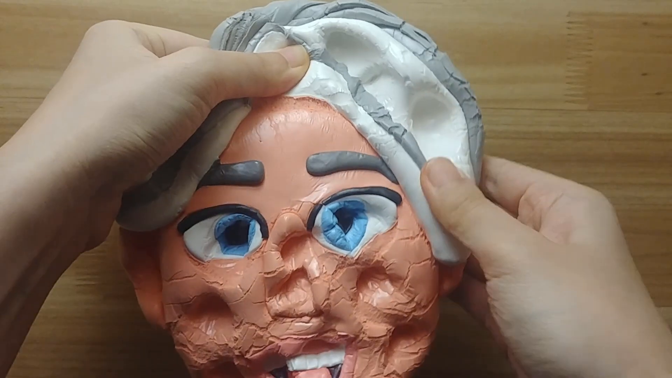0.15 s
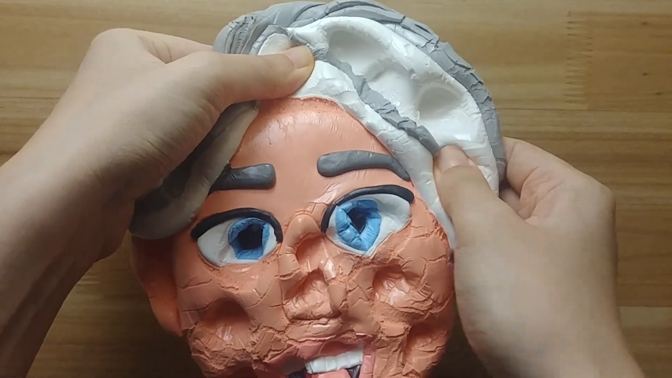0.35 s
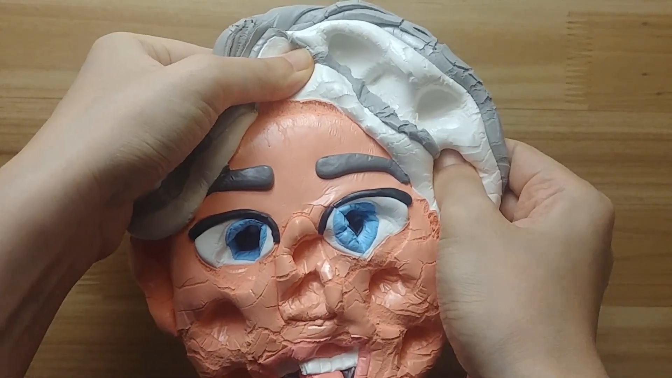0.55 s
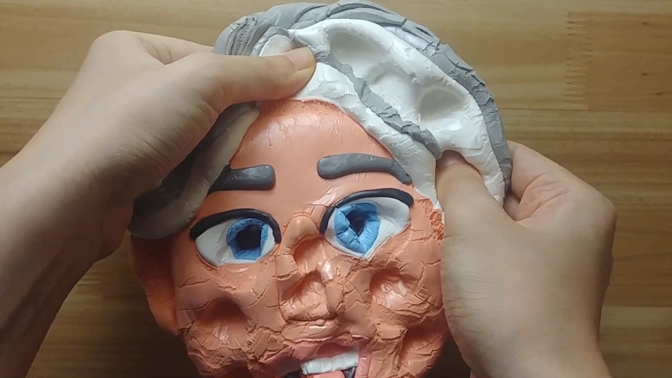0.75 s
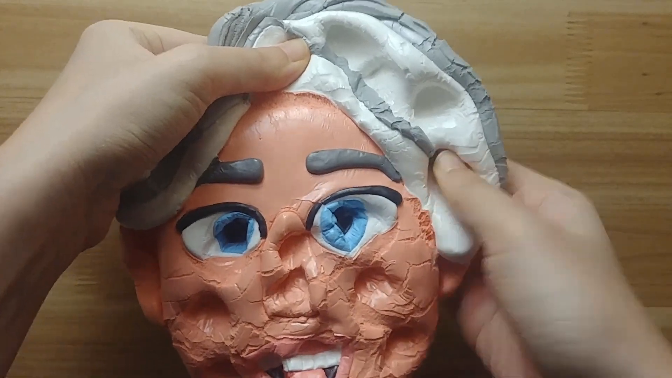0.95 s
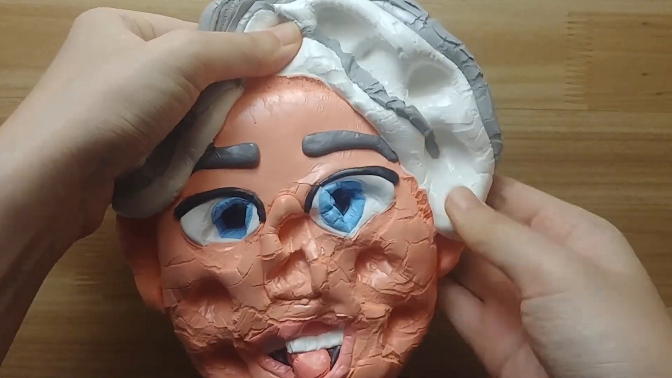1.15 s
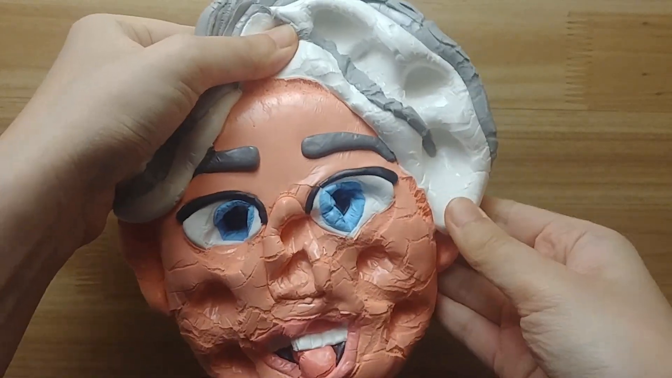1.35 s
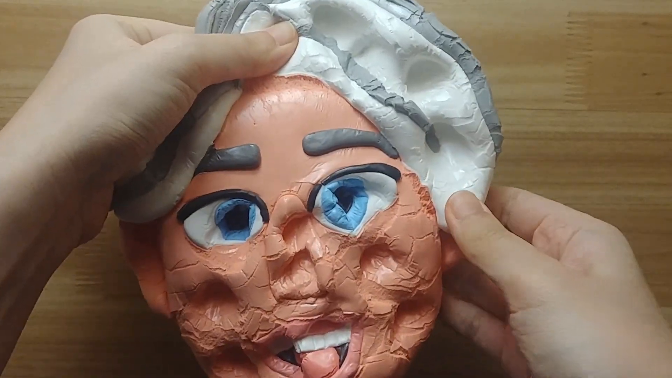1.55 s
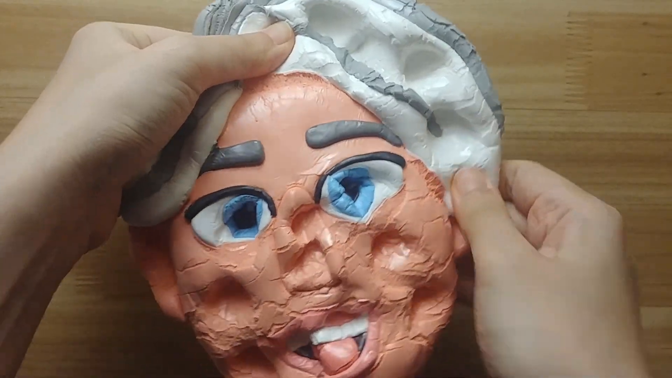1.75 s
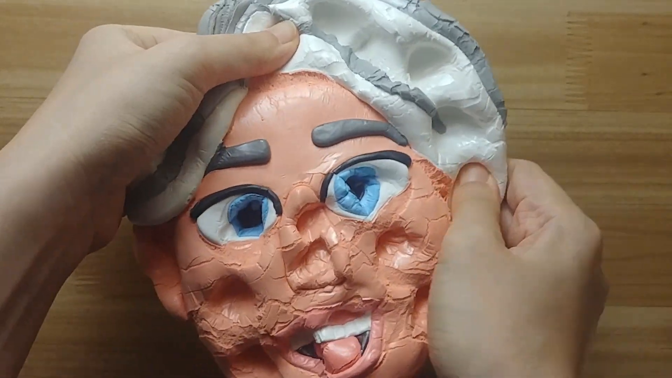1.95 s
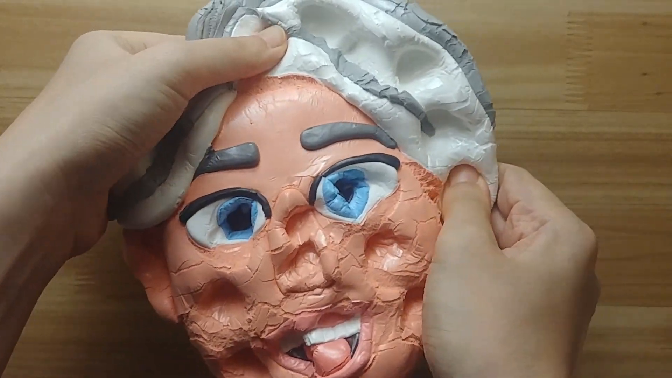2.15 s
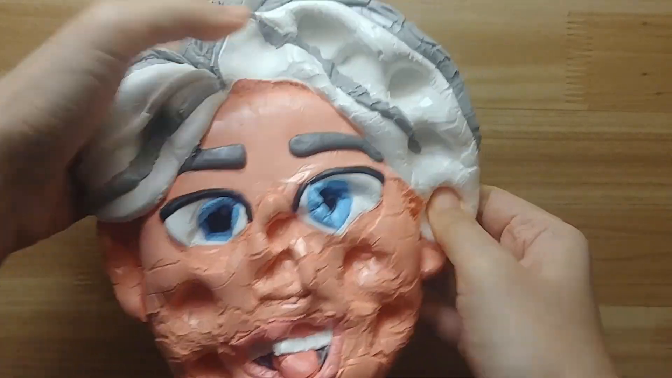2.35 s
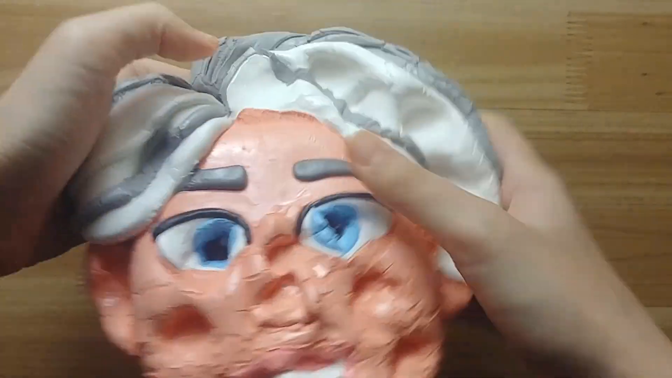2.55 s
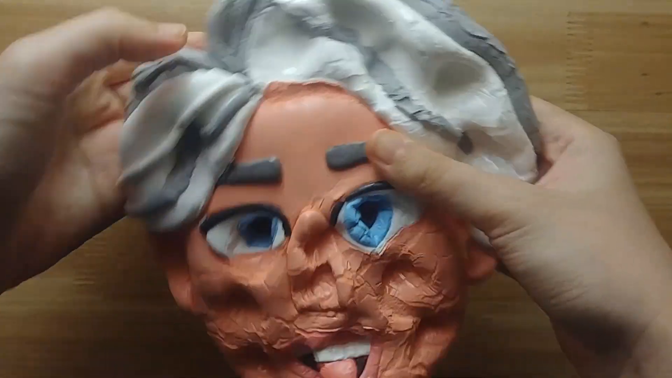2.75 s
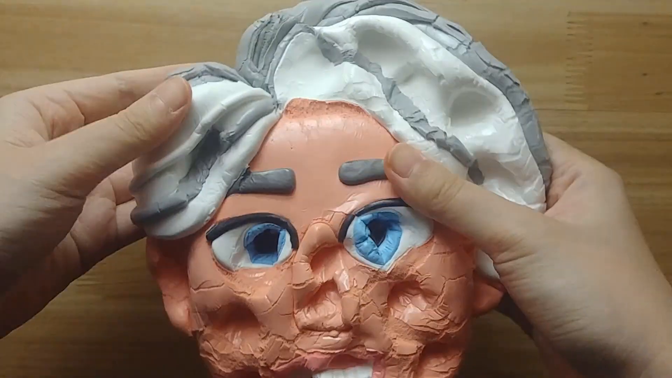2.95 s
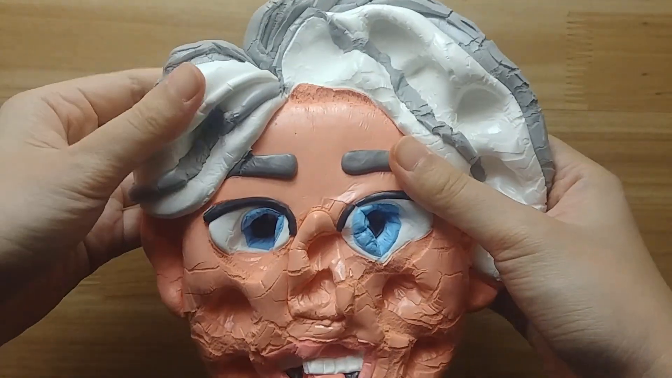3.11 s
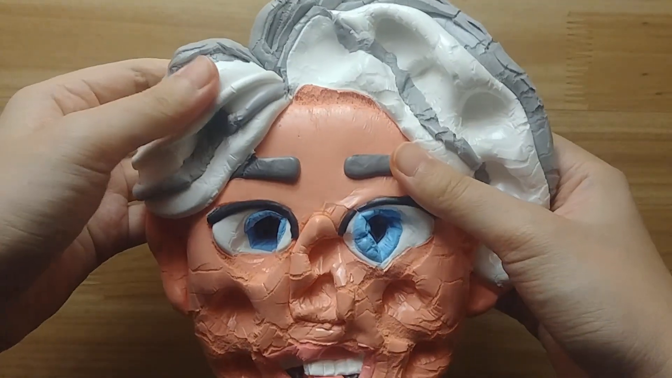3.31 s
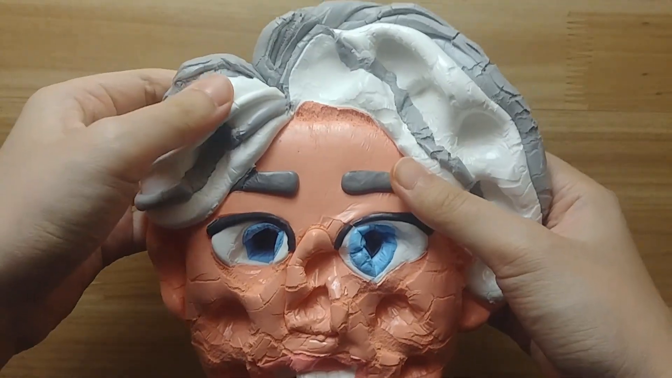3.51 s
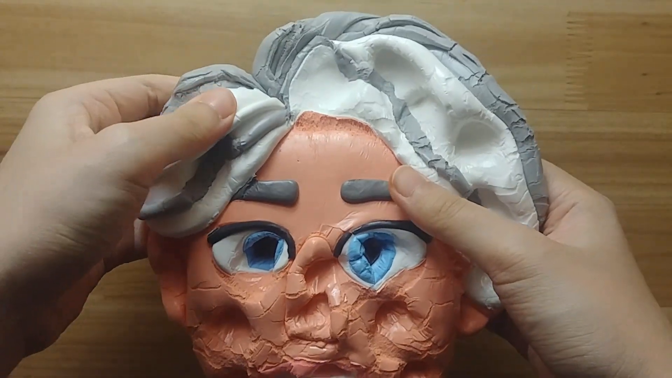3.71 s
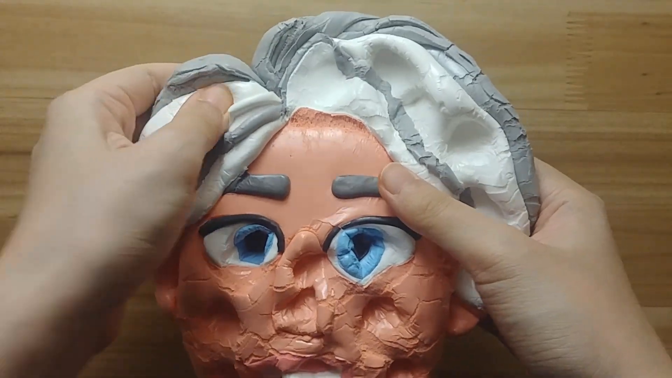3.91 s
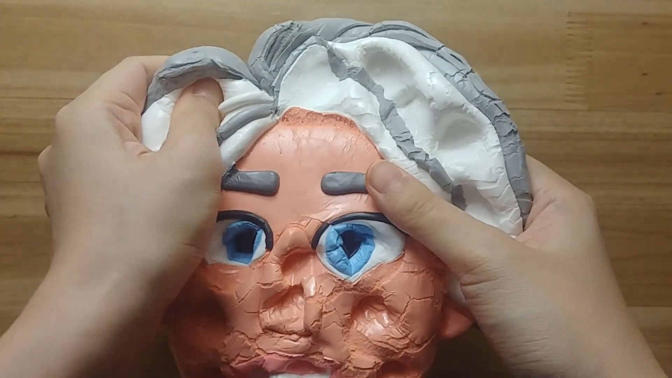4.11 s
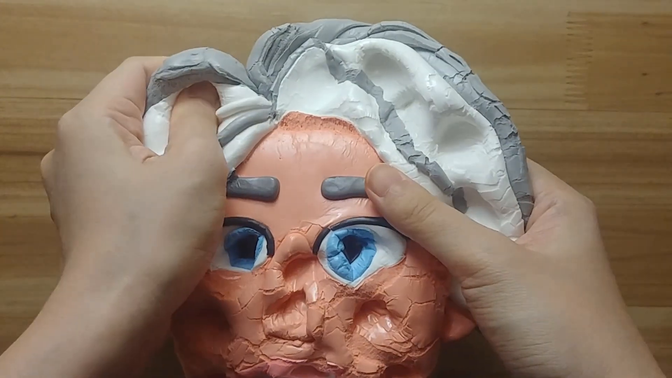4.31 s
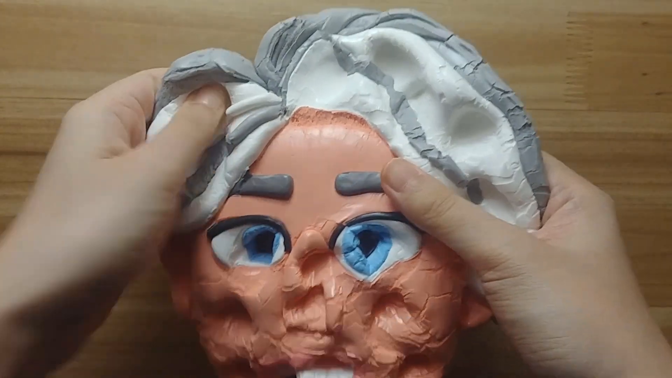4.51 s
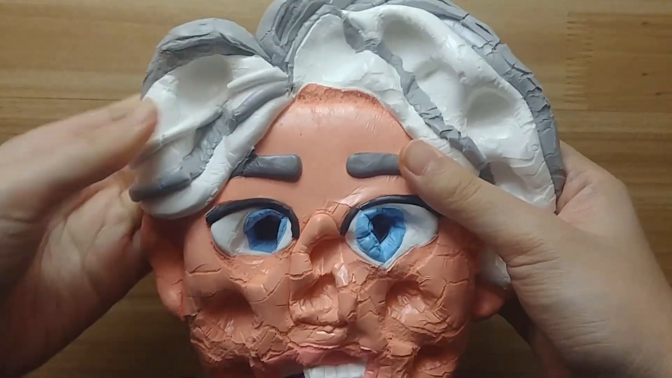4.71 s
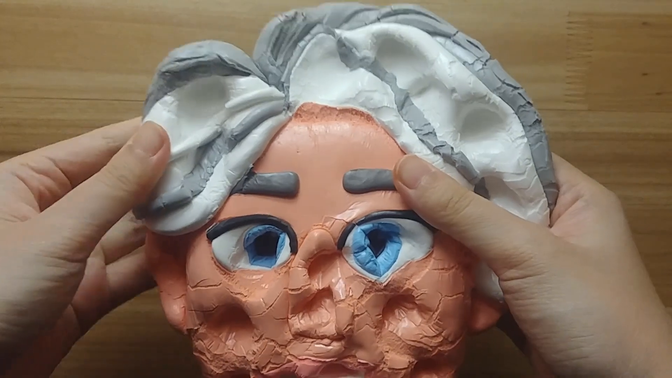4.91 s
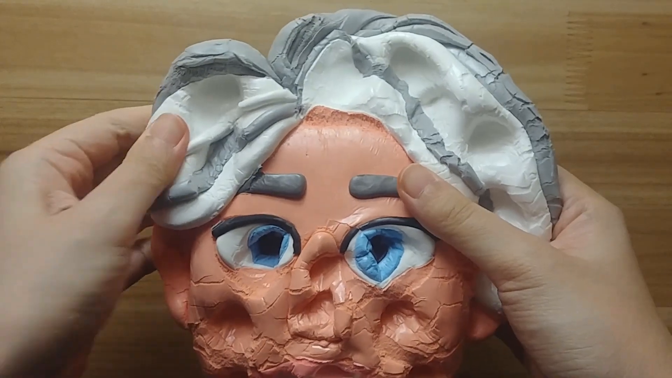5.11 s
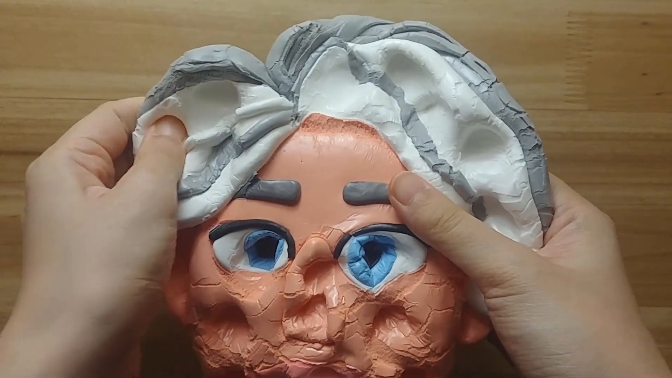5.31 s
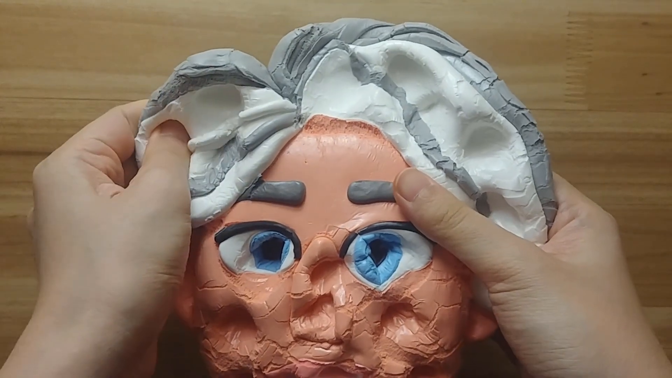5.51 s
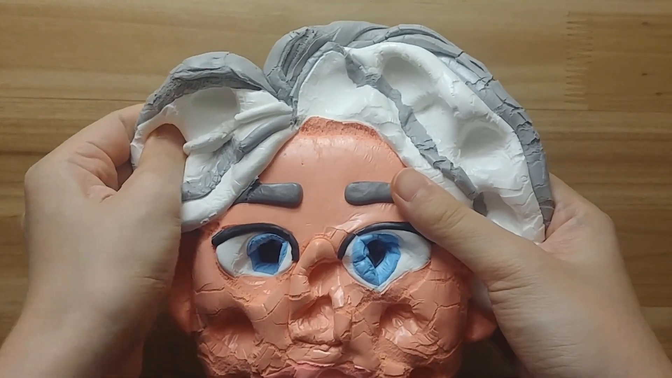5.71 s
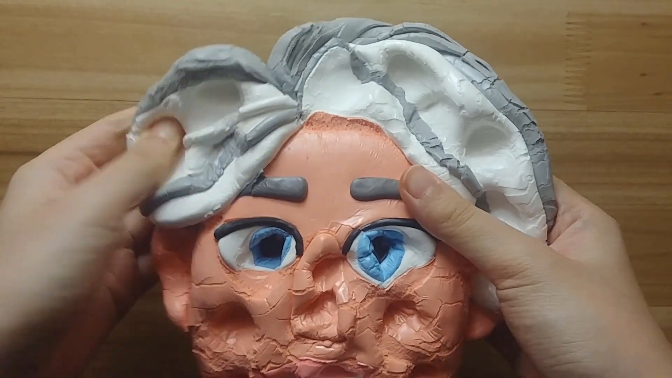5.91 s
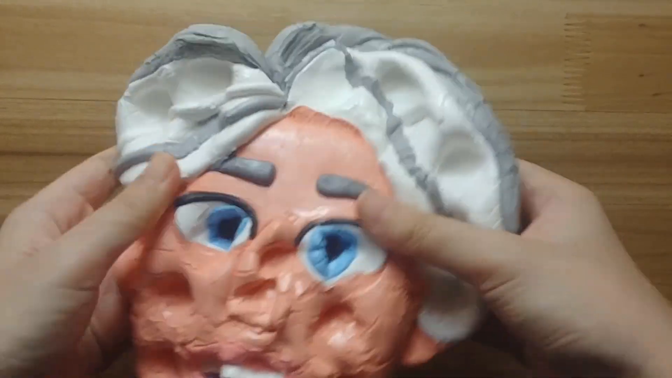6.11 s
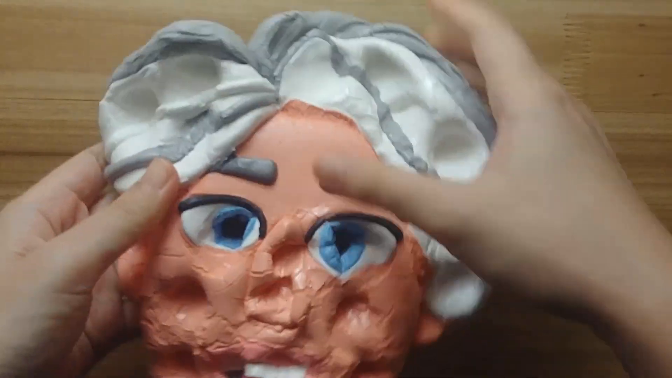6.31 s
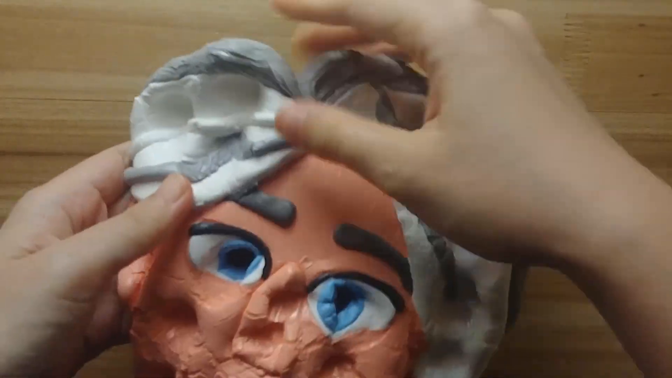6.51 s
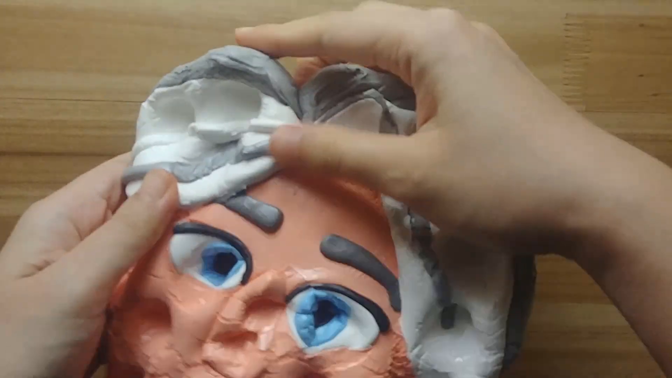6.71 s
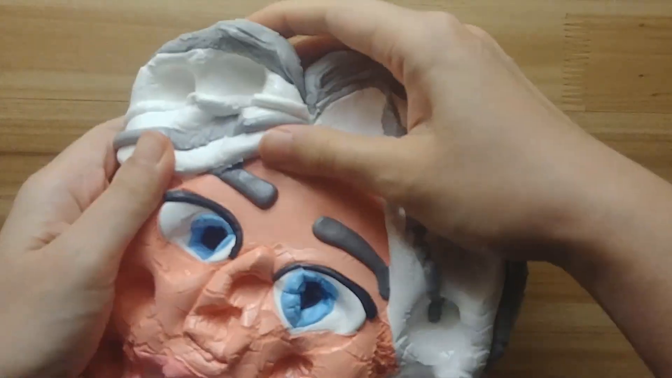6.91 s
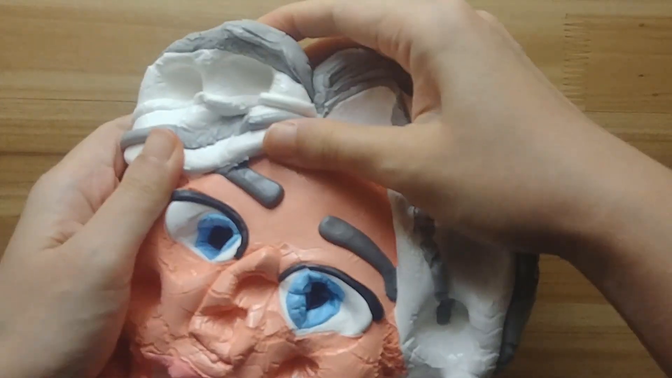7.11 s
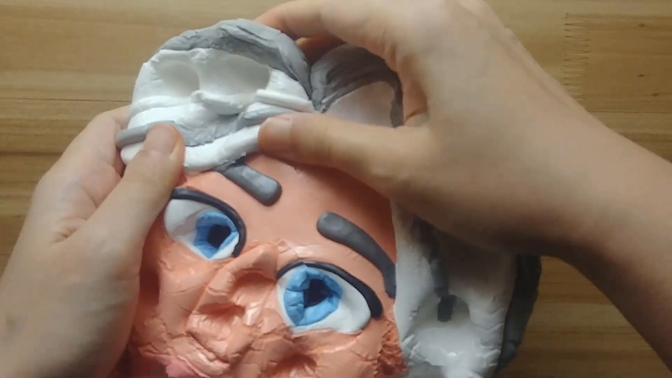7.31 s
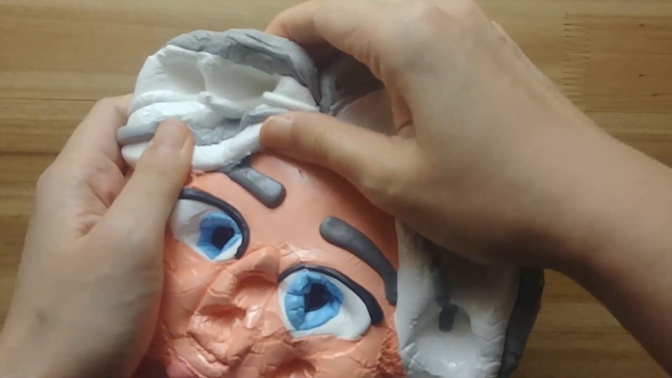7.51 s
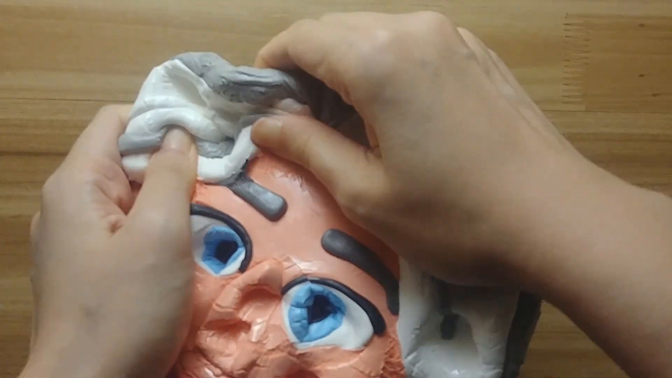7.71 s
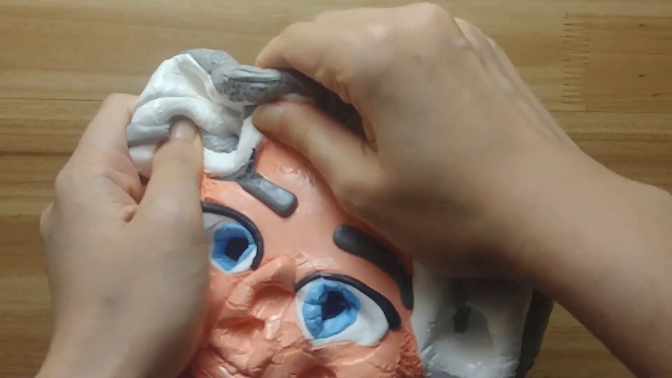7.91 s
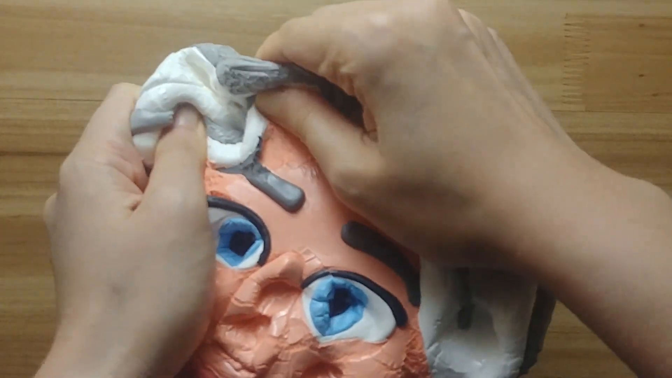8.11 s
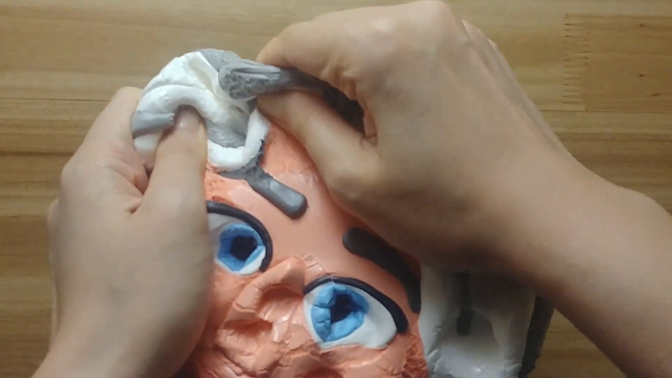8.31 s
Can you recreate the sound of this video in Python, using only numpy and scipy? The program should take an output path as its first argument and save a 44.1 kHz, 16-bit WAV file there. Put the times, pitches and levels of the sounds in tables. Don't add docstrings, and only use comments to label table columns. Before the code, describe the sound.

Dry clay glaze snaps and splinters under squeezing fingers in brief separate bursts, the first ones loud and sharp, the last softer and duller.

```python
import sys
import numpy as np
from scipy import signal
from scipy.fft import rfft, irfft
from scipy.io import wavfile

SR = 44100
rng = np.random.default_rng(int(sys.argv[2]) if len(sys.argv) > 2 else 0)


def generate_wav(signal):
    frames = np.transpose(np.atleast_2d(signal))
    scaled = np.clip(frames, -1, 1) * 32767
    pcm = np.round(scaled).astype(np.int16)
    wavfile.write(sys.argv[1], SR, pcm)


def ratio_of_db(decibels):
    return 10 ** (np.asarray(decibels, float) / 20)


N = 368235


# (start_s, snap level_db, shell ring_db over the snap, core thud_db over the snap)
CHEEK_FIRST = [(.1055, -38.5, -4.5, -22), (.1296, -18, 11, -17), (.1461, -16.5, -3.5, -18.5),
               (.1672, -27.5, -4, -27.5), (.1831, -23.5, -12, -35.5), (.19, -18, 9, -27),
               (.1985, -4.5, -1.5, -12.5), (.211, -10, -1, -15), (.2267, -20, -20, -15.5),
               (.2318, -11, 0.5, -15), (.2475, -18.5, 8, -16), (.2534, -19.5, -9, -14),
               (.2642, -17, -0.5, -19), (.2679, -14.5, 0, -9.5), (.2725, -6.5, -11.5, -15),
               (.2893, -26.5, 1.5, -6.5), (.3, -18.5, .5, -18), (.3109, -11, -9.5, -17),
               (.3201, -14.5, -11.5, -22), (.3337, -27, 2.5, -14.5), (.3572, -22.5, -8.5, -22.5),
               (.378, -23, -8, -30.5), (.3898, -25.5, -8.5, -32), (.4069, -27.5, -14, -33.5),
               (.428, -33.5, -5, -23), (.4416, -23, -27, -35), (.4543, -20.5, -1.5, -18),
               (.4636, -2.5, -4, -19.5), (.5045, -29, -8.5, -32.5), (.5393, -29, -8, -20)]
CHEEK_AGAIN = [(1.5574, -42.5, -7.5, -34), (1.5695, -24.5, 0, -37.5), (1.5781, -23, -3.5, -22),
               (1.5902, -19.5, -10, -36.5), (1.5998, -23, -4.5, -31), (1.6095, -23, -8, -34),
               (1.6234, -16, -30.5, -35.5), (1.6377, -15, -4, -35), (1.6414, -8.5, -13.5, -20.5),
               (1.669, -22.5, -5, -18), (1.6836, -16, -24.5, -22.5), (1.7014, -16, -18.5, -24),
               (1.7158, -20.5, -25, -21), (1.7188, -16, -24, -35.5), (1.726, -24.5, -14, -36),
               (1.74, -20.5, -13.5, -27), (1.7457, -17, -6.5, -23), (1.7628, -6.5, -22.5, -34),
               (1.7689, -8.5, -6.5, -24), (1.7765, -8, -12, -15.5), (1.7887, -11, -19.5, -31),
               (1.8566, -37, -2, -16), (1.8702, -18.5, -28, -28), (1.8946, -25.5, -30, -31)]
# (pitch_hz, width_hz, level_db)
RIGHT_SHELL = [(2405, 350, -7.5), (2770, 500, 1.5), (3069, 160, -3.5)]
# (pitch_hz, level_db per Hz)
RIGHT_CORE = [(60, -29.5), (150, -21), (400, -14.5), (750, -8.5), (1080, -1), (1300, -5.5), (1900, -4),
              (2500, -27.5), (4400, -90)]


def right_cheek():
    cracks = [squeeze(CHEEK_FIRST, GRIPS[0]), squeeze(CHEEK_AGAIN, GRIPS[1])]
    return clay(cracks, RIGHT_SHELL, RIGHT_CORE, thick_db=3.0)


# (start_s, snap level_db, shell ring_db over the snap, core thud_db over the snap)
CURL_FIRST = [(3.7389, -40, -25, -13), (3.7462, -31.5, -29, -36), (3.7616, -36, -47, -16),
              (3.7661, -24.5, -21, -31), (3.771, -13.5, -7.5, -11), (3.7866, -26.5, -29, -10),
              (3.7907, -22.5, -26, -30), (3.81, -21.5, -19.5, -33), (3.8138, -15, -10, -15),
              (3.8173, -11.5, -12, -13.5), (3.822, -11.5, -24.5, -14), (3.8514, -27.5, -29, -38.5),
              (3.862, -27, -24.5, -20), (3.8675, -9.5, -15.5, -22.5), (3.8818, -12.5, -6, -19),
              (3.8963, -12.5, -22.5, -20.5), (3.9193, -28.5, -8.5, -15), (3.9365, -20.5, -25.5, -19.5),
              (3.953, -10.5, -5.5, -7), (3.9707, -17.5, -3, -14), (3.9757, -16, -43, -22),
              (3.9865, -25.5, -28, -35), (4.002, -24, -10, -16), (4.0176, -31.5, -24.5, -25),
              (4.0339, -28, -6.5, -21), (4.0508, -29.5, -2, -33), (4.0709, -28, -30, -41),
              (4.0868, -27.5, -35.5, -39), (4.1073, -46, -33, -39), (4.1216, -38, -25, -32.5)]
CURL_AGAIN = [(5.1391, -37, -10, -11), (5.142, -19, -25, -24), (5.1499, -28, -3.5, -23.5),
              (5.1531, -21, -7, -23), (5.164, -20, -3.5, -17), (5.171, -19.5, -5, -13.5),
              (5.1781, -21.5, -12, -16), (5.2053, -22, -14, -36), (5.2219, -30.5, -25, -17),
              (5.2266, -30, -7, -18), (5.2419, -16.5, -9, -18), (5.2643, -24, -10, -22.5),
              (5.2683, -15.5, -27.5, -27.5), (5.272, -10, -23.5, -21), (5.2944, -15, -17, -16.5),
              (5.331, -21, -11, -14.5), (5.3542, -31, -3.5, -10), (5.3613, -17.5, -8.5, -31),
              (5.3711, -27, -6.5, -12.5), (5.3819, -28.5, -1, -22), (5.385, -23, -41, -11),
              (5.4072, -28, -19.5, -35), (5.4305, -38, -25, -34.5)]
# (pitch_hz, width_hz, level_db)
LEFT_SHELL = [(2120, 5000, -8.5), (2665, 1200, -3), (3100, 1100, -11.5)]
# (pitch_hz, level_db per Hz)
LEFT_CORE = [(150, -39.5), (400, -18), (720, -22.5), (850, -4.5), (1140, -1.5), (1500, -1), (2000, -3),
             (2600, -21.5), (4400, -89.5)]


def left_curl():
    cracks = [squeeze(CURL_FIRST, GRIPS[2]), squeeze(CURL_AGAIN, GRIPS[3])]
    return clay(cracks, LEFT_SHELL, LEFT_CORE, thick_db=2.02)


# (start_s, snap level_db, shell ring_db over the snap, core thud_db over the snap)
FOLD = [(7.6388, -47, -22, -26.5), (7.6666, -39.5, -22, -54), (7.6979, -27.5, -32, -20),
        (7.7235, -29.5, -15.5, -21), (7.7308, -29, -3, -19), (7.7406, -28, -4, -13.5),
        (7.7517, -25.5, -23, -22.5), (7.7564, -9.5, -10, -19), (7.7697, -24, -6, -16),
        (7.7766, -24, -15, -31.5), (7.7917, -29.5, -16, -32.5), (7.7998, -29.5, -18, -36.5),
        (7.851, -35, -24.5, -21), (7.8682, -35.5, -17, -39), (7.8803, -33, -12.5, -30),
        (7.8858, -31.5, -6, -9), (7.8913, -26.5, -0.5, -11.5), (7.9075, -31.5, -2, -5.5),
        (7.9266, -26.5, -27, -55), (7.9341, -31.5, -25, -43), (7.955, -30.5, -9, -31),
        (7.9984, -44.5, -29, -34), (8.0168, -30.5, -5, -8.5), (8.0306, -37, 3, -4), (8.0371, -33, -17, -26),
        (8.0849, -38, -23, -26.5), (8.0959, -34.5, -8, -13), (8.1075, -36.5, -9, -11),
        (8.1469, -33, -4, -12), (8.1723, -31, -6, -11)]
# (pitch_hz, width_hz, level_db)
FOLD_SHELL = [(2510, 630, -11.5), (2810, 500, -3), (3260, 510, -5)]
# (pitch_hz, level_db per Hz)
FOLD_CORE = [(150, -26), (500, -19.5), (1000, -10), (1250, -0.5), (1650, 0.5), (2000, -4.5), (2600, -27),
             (4400, -91)]


def folding_clay():
    return clay([squeeze(FOLD, GRIPS[4])], FOLD_SHELL, FOLD_CORE, thick_db=5.0)


# (top octave level_db over the snap,
# top lost_db per dB of core thud, top lost_db per dB of snap)
GRIPS = [
    (-11.5, 0.053, -0.029),
    (-12.5, 0.12, -0.19),
    (-11, -0.065, .05),
    (-10, 0.056, .4),
    (-17, 0.28, .2),
]
CRUMB_AFTER_S = (.009, .024)


def squeeze(cracks, grip):
    cracks = np.array(cracks)
    start_s, snap_db, _, thud_db = cracks.T
    top_db, dulling, thinning = grip
    luck = rng.standard_normal((3, len(cracks)))
    wait_s = rng.uniform(*CRUMB_AFTER_S, len(cracks))

    top = top_db - dulling * (thud_db + 24) - thinning * (snap_db + 22)
    top += 2 * luck[0]
    pan_db = 4.8 + 0.8 * luck[1]
    crumb_db = snap_db - 17 + 3 * luck[2]
    crumb_ring_db, crumb_thud_db = np.full_like(top, -14), np.full_like(top, -30)

    breaks = np.column_stack([cracks, top, pan_db])
    crumbs = np.column_stack([start_s + wait_s, crumb_db, crumb_ring_db, crumb_thud_db, top, pan_db])
    return np.vstack([breaks, crumbs])


# (pitch_hz, level_db per Hz)
SNAP = [(900, -46), (1600, -27.5), (2600, -13.5), (3500, -10), (4300, -9.5), (5300, -6.5), (6800, -5),
        (7650, 5), (8500, -1), (9500, -11), (10700, -21), (14000, -56)]
# (pitch_hz, level_db per Hz)
TOP = [(9000, -46), (10600, -17.5), (11400, -1.5), (12400, -0.5), (15200, 4), (15900, -7)]


def clay(cracks, shell_modes, core_points, thick_db):
    glaze, top, shell, core = fractures(cracks)
    snap = [(hz, db - thick_db * np.log2(hz / 5500)) for hz, db in SNAP]
    hard = colour(glaze, snap) + colour(top, TOP)
    return hard + ring(shell, shell_modes) + colour(core, core_points)


CRACK_T60_S = [0.043, 0.034, 0.0097, .02]
ROOM_T60_S = [.15, 0.1, .13, 0.13]
ROOM_DB = [-12, -10, -12, -8.5]
FIRST_BREAK = [0.42, 0.33, 0.35, 0.4]
PARTING = [2.3, 1.2, 3, 2.9]
# (centre pitch_hz, spread_octaves, sharpness Q, share)
FLAKES = [(4400, .28, 4, .45), (2500, .12, 4, .45)]


def fractures(cracks):
    t = np.arange(3400) / SR
    force = np.zeros((4, 2, N + len(t)))

    def per_layer(table):
        return np.array(table)[:, None, None]

    fade = ratio_of_db(-60 * t / per_layer(CRACK_T60_S))
    fade *= 1 + per_layer(FIRST_BREAK) * np.exp(-t / 0.0006)
    echo = ratio_of_db(per_layer(ROOM_DB) - 60 * t / per_layer(ROOM_T60_S))
    echo *= np.sqrt(1 - np.exp(-t / 0.0013))

    for start_s, db, shell_db, core_db, top_db, pan_db in np.concatenate(cracks):
        burst = fade * splits(t, scatter_db=-3.0, clump_s=0.0009)
        burst *= np.sqrt(np.sum(fade ** 2, axis=2) / np.sum(burst ** 2, axis=2))[..., None]
        burst[..., 0] += rng.choice([-1, 1]) * np.array(PARTING)[:, None]
        burst += echo * rng.standard_normal((2, len(t)))
        burst[0] = flake(burst[0], *FLAKES[0])
        burst[2] = flake(burst[2], *FLAKES[1])
        share = ratio_of_db(db + np.array([-0.3, top_db, shell_db - 0.5, core_db + 0.23]))
        i = int(start_s * SR)
        force[..., i:i + len(t)] += per_layer(share) * sides(pan_db) * burst
    return force[..., :N]


ALIKE = [0.084, .087, 0.48, 0.37]


def splits(t, scatter_db, clump_s):
    clump = (t / clump_s).astype(int)
    size = ratio_of_db(scatter_db * rng.standard_normal(len(t)))[clump]
    shared, own = rng.standard_normal((2, len(t)))
    alike = np.array(ALIKE)[:, None]
    one_port = np.tile(shared, (len(ALIKE), 1))
    other_port = alike * shared + np.sqrt(1 - alike ** 2) * own
    return np.stack([one_port, other_port], axis=1) * size


def flake(x, hz, octaves, sharp, share):
    pitch_hz = hz * 2 ** (octaves * np.clip(rng.standard_normal(), -2, 2))
    b, a = signal.iirpeak(pitch_hz, sharp, fs=SR)
    ringing = np.sqrt(sharp) * signal.lfilter(b, a, x)
    return (x + share * ringing) / np.sqrt(1 + share ** 2)


def ring(x, modes):
    out = 0
    for hz, width, db in modes:
        b, a = signal.iirpeak(hz, hz / width, fs=SR)
        tone = signal.lfilter(b, a, signal.lfilter(b, a, x))
        out = out + ratio_of_db(db) * tone / np.sqrt(np.pi * width / SR / 2)
    return out


def curve_db(hz, points):
    at, db = np.transpose(points)
    return np.interp(np.log(np.maximum(hz, 1)), np.log(at), db)


def colour(x, points):
    db = curve_db(np.arange(2049) * SR / 4096, points)
    cepstrum = irfft(np.log(ratio_of_db(np.maximum(db, -80))))
    cepstrum[1:2048] *= 2
    cepstrum[2049:] = 0
    taps = irfft(np.exp(rfft(cepstrum)))
    taps /= np.sqrt(np.sum(taps ** 2))
    return signal.fftconvolve(x, taps[None], axes=1)[:, :N]


def sides(pan_db):
    return ratio_of_db(np.array([[pan_db], [-pan_db]]) / 2)


# (start_s, end_s)
SQUEEZES = [
    (.105, .573),
    (1.553, 1.906),
    (3.735, 4.139),
    (5.137, 5.44),
    (7.638, 8.205),
]


def gate():
    t, edge_s = np.arange(N) / SR, 0.002
    is_open = 0
    for start_s, end_s in SQUEEZES:
        is_open = is_open + np.clip(np.minimum(t - start_s + edge_s, end_s - t) / edge_s, 0, 1)
    return is_open


# (pitch_hz, level_db per Hz)
TONE = [(15, -61.5), (25, -30), (32, -25), (41, -13.5), (56, -7), (91, 0.5), (133, -6.5), (284, -10.5),
        (771, -17.5), (4700, -26), (10300, -35.5), (15800, -30.5)]


def room_tone():
    size = round(109 / 30 * SR)
    noise = rfft(rng.standard_normal((3, size)))
    hz = np.arange(size // 2 + 1) * SR / size
    alike = 0.5 / (1 + (hz / 150) ** 2)
    port_db = 3.5 / (1 + ((hz - 7600) / 450) ** 2)
    gain = ratio_of_db(curve_db(hz, TONE) + port_db)
    ports = irfft(gain * (np.sqrt(1 - alike) * noise[:2] + np.sqrt(alike) * noise[2]), size)
    bed = np.tile(ports / np.sqrt(np.mean(ports ** 2)), 3)[:, :N]
    return bed * sides(1.6) * ratio_of_db(-57)


def scene():
    figure = right_cheek() + left_curl() + folding_clay()
    return figure * gate() + room_tone()


def top_cut(x):
    return signal.sosfilt(signal.butter(12, 16000, fs=SR, output="sos"), x)


def record(dry):
    bend = signal.lfilter(*signal.butter(2, [50, 2500], "band", fs=SR), dry ** 2)
    mix = np.clip(dry + 0.036 * bend, -1, 1)
    return top_cut(mix)


dry = scene()
out = record(dry)
generate_wav(out)
```